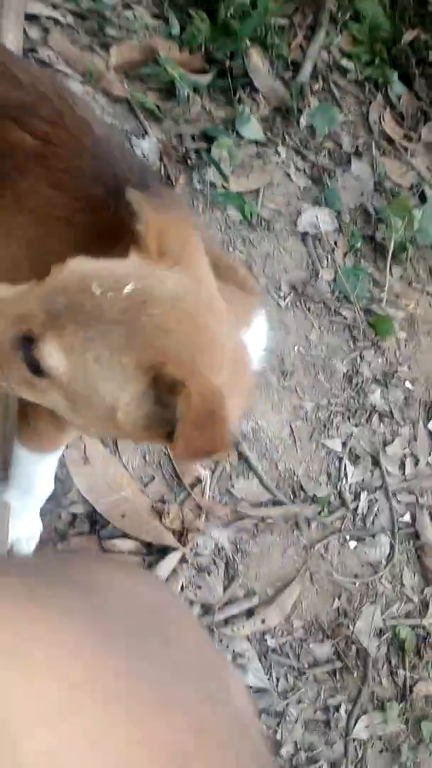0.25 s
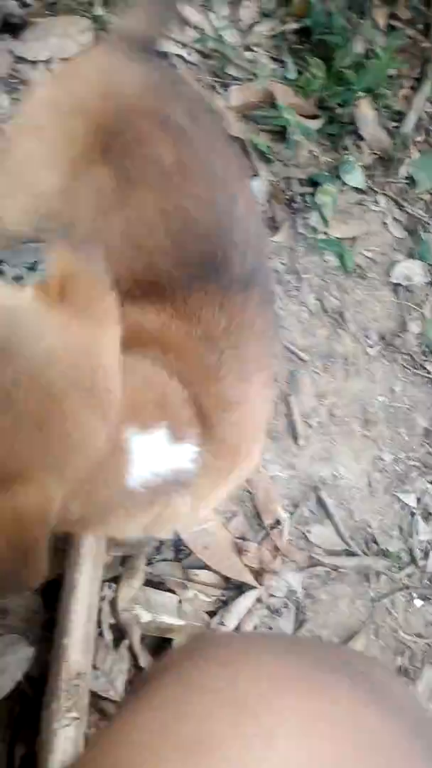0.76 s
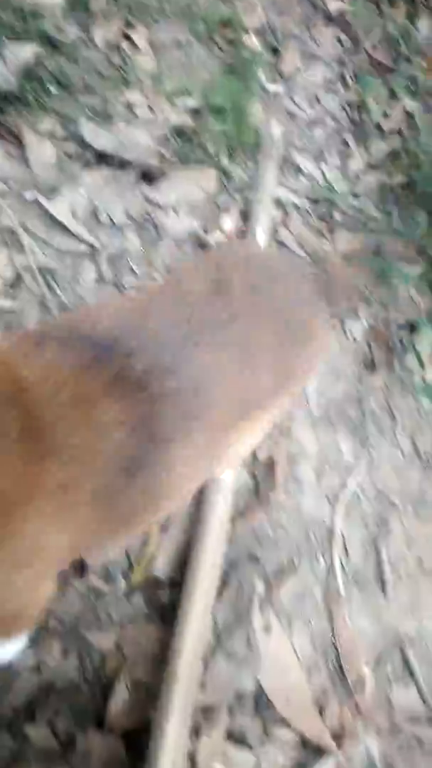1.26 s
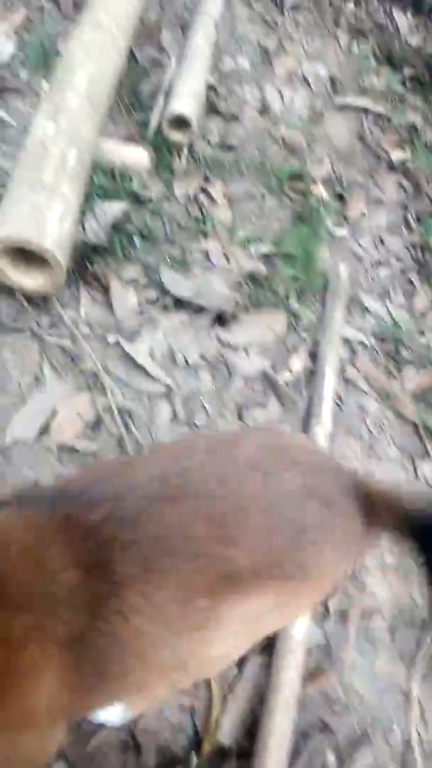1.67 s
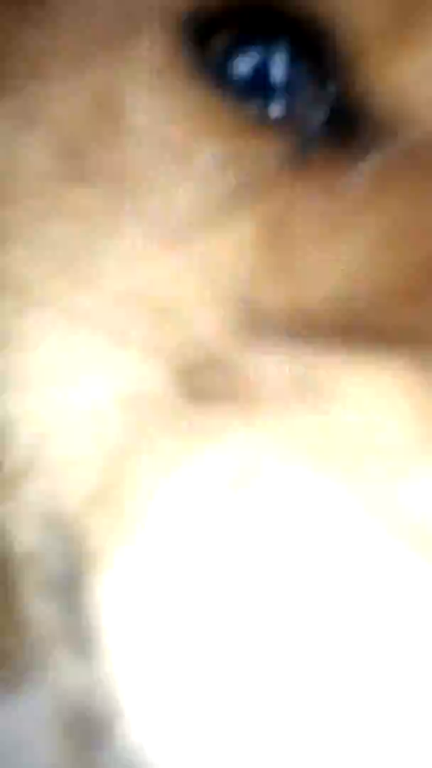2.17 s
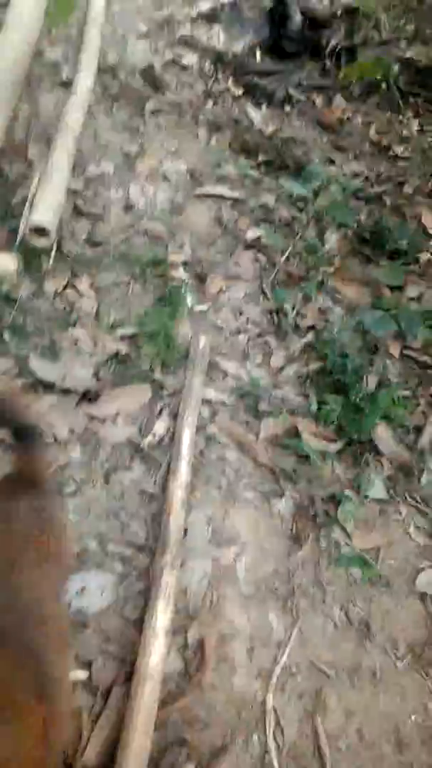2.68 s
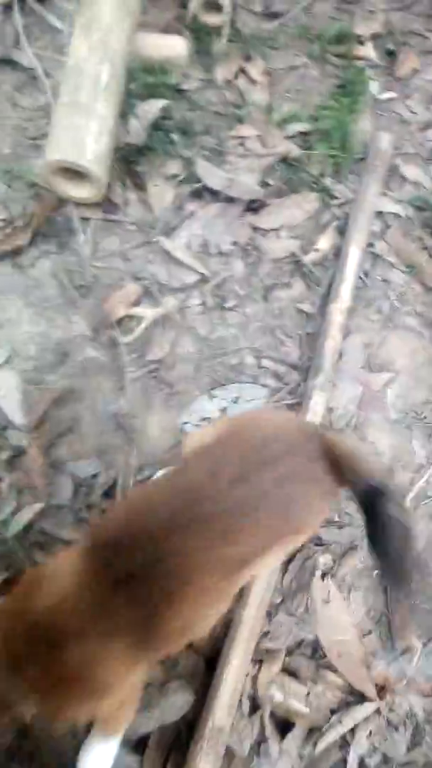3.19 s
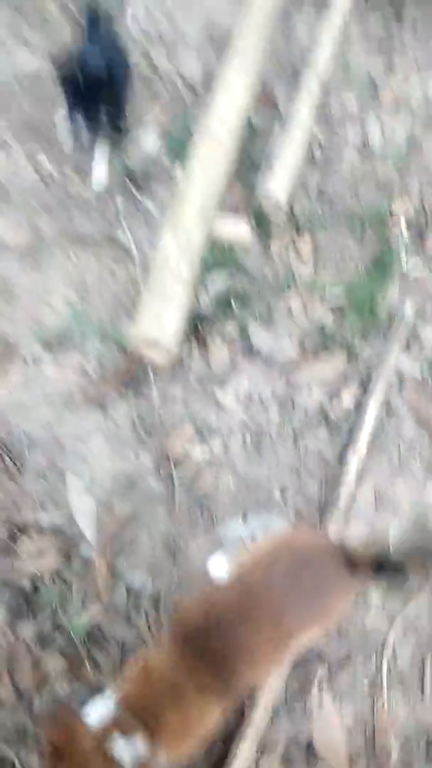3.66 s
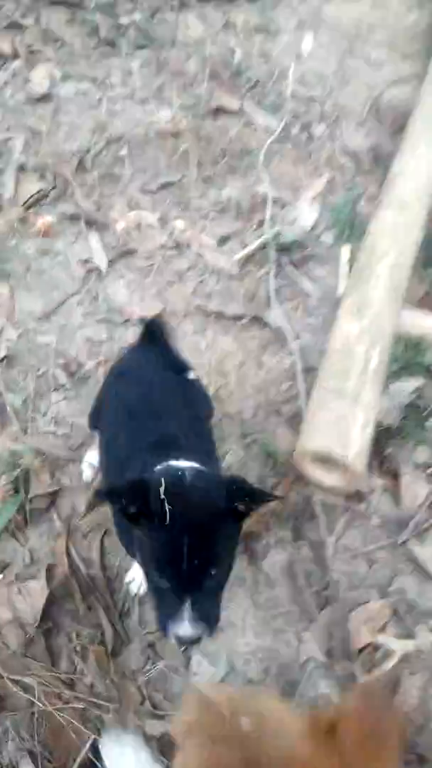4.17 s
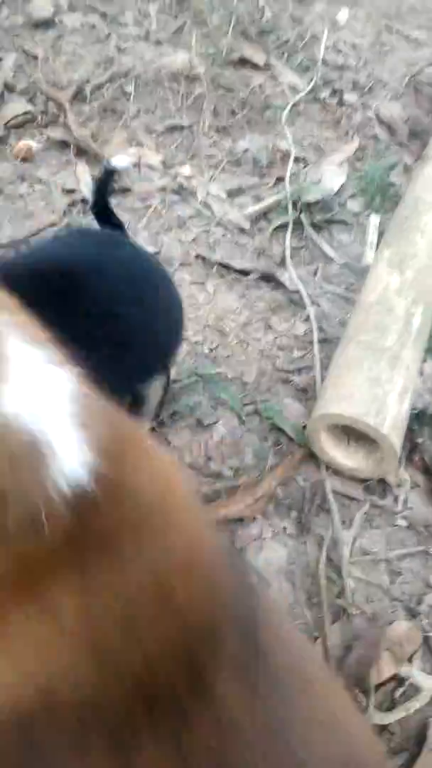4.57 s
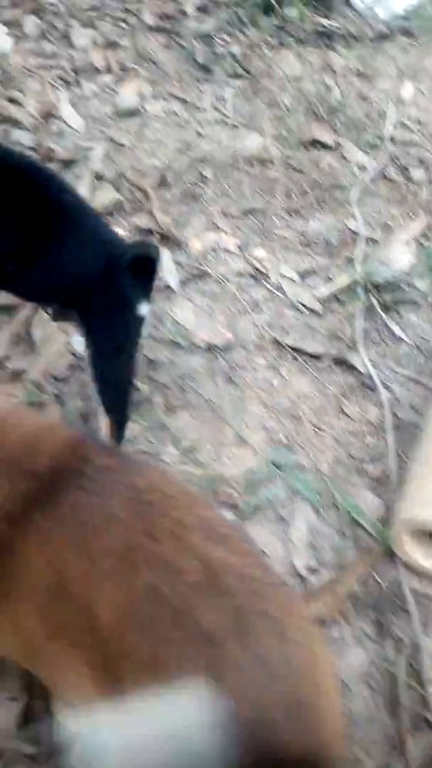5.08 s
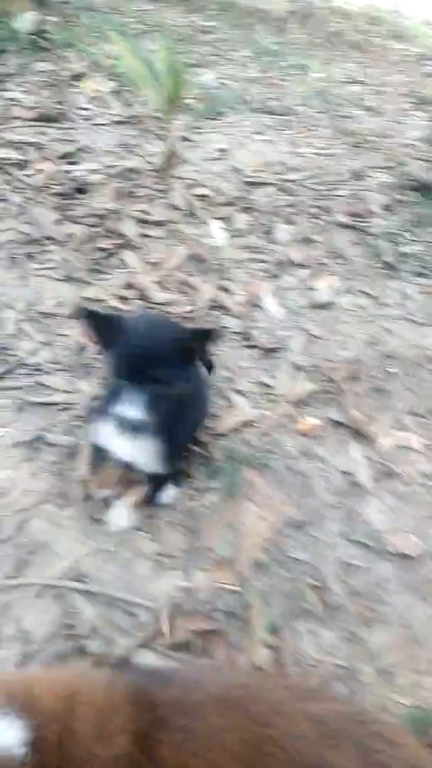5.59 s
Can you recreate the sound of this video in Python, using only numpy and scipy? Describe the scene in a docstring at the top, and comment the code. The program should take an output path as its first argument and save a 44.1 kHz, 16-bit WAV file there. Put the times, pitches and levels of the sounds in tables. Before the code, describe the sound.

Puppies move around a hand-held microphone on a leafy dirt path. At first it is quiet: a croaky grunt, faint hiss, small rustles. Crackling steps build, then a muffled cluster of bumps and scratchy rubbing hits the microphone, with a short snuff. Separate leaf crunches follow, then a rush of bright, brittle trampling with sharp snaps lasts to the end. Dry, close, no echo.

```python
"""A soft creaky grunt over faint hiss is heard first; then puppies trample dry leaves around a hand-held phone.
The leaves are clumps of short wavelets, driven by settling litter, pressing paws and single crunches.
Grunts are pulses ringing throat resonances, snorts are noise through a nasal resonance, rumble is low noise.
A nose shoved against the phone gives low swinging bumps and a rasp over the microphone port, whose cavity
rings near 6.5 kHz. Sharp clicks ring the same port."""
import sys
import numpy as np
from scipy import signal
from scipy.io import wavfile
from scipy.ndimage import uniform_filter1d

SR = 44100
rng = np.random.default_rng(int(sys.argv[2]) if len(sys.argv) > 2 else 0)


def transcribe(u):
    """Save the signal u as a 16-bit wav file named by the first command-line argument.

    u: samples, shape (n,) or (channels, n), limited to [-1, 1]; the rate is SR.
    q: integer samples, one column per channel.
    """
    v = np.clip(np.atleast_2d(u).T, -1, 1)
    q = np.round(v * 32767).astype(np.int16)
    wavfile.write(sys.argv[1], SR, q)


N = 257676
TIME = np.arange(N) / SR  # s
HZ = np.fft.rfftfreq(4096, 1 / SR)  # frequency grid of the colouring filters


def amp(db):
    """Decibel law: 20 dB is a factor of ten in amplitude."""
    return 10 ** (np.asarray(db) / 20)


def evened(x):
    """Normalization by mean power: the result has rms 1."""
    return x / np.sqrt(np.mean(x ** 2) + 1e-20)


def read(points, hz):
    """Interpolation of a spectrum on a logarithmic frequency axis."""
    f, value = np.transpose(points)
    return np.interp(np.log(hz + 1), np.log(f + 1), value)


def add(mix, s, sound):
    """Superposition: the sound adds to the mix from time s, in place."""
    part = mix[round(s * SR):][:len(sound)]
    part += sound[:len(part)]


def drift(n, span):
    """Low-pass random modulation: averaged noise of rms 1 that changes over about span samples."""
    knots = rng.standard_normal(n // 16 + 2)
    smooth = uniform_filter1d(knots, max(round(span / 16), 1))
    return evened(np.repeat(smooth, 16)[:n])


def colour(x, points):
    """Minimum-phase filtering: the Hilbert transform of the log spectrum gives a causal response."""
    log_gain = np.maximum(read(points, HZ), -100) * np.log(10) / 20
    full = np.r_[log_gain, log_gain[-2:0:-1]]
    phase = -signal.hilbert(full).imag
    taps = np.fft.ifft(np.exp(full + 1j * phase)).real[:2048]
    return signal.oaconvolve(x, taps)[:len(x)]


# Spectrum of the far hiss: (f/Hz, level/dB)
AIR_SPECTRUM = [(30, -9.5), (90, -2.5), (230, -1.5), (600, -16.5), (1100, -5), (2600, -27.5), (4500, -12),
                (5300, -3), (6600, -1.5), (7600, -46), (8600, -55), (13400, -40), (14800, -42),
                (15800, -22)]
AIR_DB = -65.5  # rms level


def air_hiss():
    """Stationary broadband noise: white noise shaped by a fixed spectrum."""
    return amp(AIR_DB) * evened(colour(rng.standard_normal(N), AIR_SPECTRUM))


# Hand and ground rumble: (t/s, level/dB, level of the deep part/dB)
RUMBLE_LEVELS = [(0.0, -71, -75), (0.32, -73.5, -77.5), (0.55, -59, -78), (0.748, -68.5, -76),
                 (1.15, -73.5, -75), (1.74, -76, -78), (2.13, -70, -79), (2.3, -51, -47.5),
                 (2.39, -59, -66), (2.52, -49.5, -62), (2.6, -70, -60.5), (2.9, -69.5, -69.5),
                 (3.02, -51, -89), (3.12, -66, -75), (3.4, -74.5, -79), (3.95, -72.5, -72),
                 (4.08, -71, -66), (4.28, -61.5, -74.5), (4.6, -62, -75), (4.88, -63, -67), (5.1, -83, -85),
                 (5.24, -57.5, -75), (5.84, -66, -79)]
# Spectrum of the upper rumble: (f/Hz, level/dB)
RUMBLE_SPECTRUM = [(60, -27.5), (130, -4.5), (215, -2.5), (500, -4), (900, -8.5), (1200, -10), (2000, -65)]
# Spectrum of the deep rumble: (f/Hz, level/dB)
DEEP_SPECTRUM = [(12, -40), (30, -20), (70, -6), (110, -7), (200, -19), (400, -81)]


def rumble():
    """Amplitude-modulated low noise: hand and ground give two spectra that share random lumps."""
    s, *levels_db = np.transpose(RUMBLE_LEVELS)
    lumps = amp(3.4 * drift(N, 900))
    total = np.zeros(N)
    for level_db, spectrum in zip(levels_db, (RUMBLE_SPECTRUM, DEEP_SPECTRUM)):
        noise = colour(rng.standard_normal(N) * lumps, spectrum)
        total += amp(np.interp(TIME, s, level_db)) * evened(noise)
    return total


# Air snorted through a puppy's nose, one list per snort: (t/s, level/dB, centre f/Hz)
SNORT_PATHS = [
    [(0.86, -61, 900.0), (0.96, -55, 840), (0.964, -59.5, 820), (1.112, -67.5, 880), (1.136, -62, 900.0),
     (1.15, -68, 900.0)],
    [(2.43, -61, 1100.0), (2.458, -44, 1000), (2.48, -48, 1020), (2.5, -55, 1100.0)],
]


def snort(rows):
    """Turbulence and resonance: noise passes one broad nasal resonance of moving centre frequency."""
    s, level_db, hz = np.transpose(rows)
    t = np.arange(s[0], s[-1], 1 / SR)
    turn = np.exp(2j * np.pi * np.cumsum(np.interp(t, s, hz)) / SR)
    pole = np.exp(-np.pi * 1200 / SR)  # 1200 Hz wide, used twice
    # shift the centre to zero frequency, low-pass, shift back
    air = rng.standard_normal(len(t)) / turn
    air = signal.lfilter([1], np.convolve([1, -pole], [1, -pole]), air)
    air = (turn * air).real
    return s[0], evened(air) * amp(np.interp(t, s, level_db)) * signal.windows.tukey(len(t), .2)


# Creaky grunts, one list per grunt:
# (t/s, claps per s, nominal clap peak level/dB, mouth opening as level/dB on the upper resonances)
GRUNT_PATHS = [
    [(0, 76, -40, 14), (.035, 58, -38, -3), (.07, 57, -36, 1), (.088, 48, -37, 0), (.108, 39, -53, 4)],
    [(.808, 59, -42, 9), (.838, 56, -39, 3), (.85, 105, -43, 3), (.885, 112, -46, 0)],
]
# Throat resonances, before the mouth opening: (f/Hz, width/Hz, level/dB)
THROAT_RESONANCES = [(766, 185, -0.5), (1640, 480, 8.5), (2470, 150, -9), (3210, 250, -9)]


def grunt(rows):
    """Source and filter: slack vocal folds clap weak and strong in turn; each clap rings the throat."""
    s, rate, peak_db, open_db = np.transpose(rows)
    t = np.arange(s[0], s[-1], 1 / SR)
    count = np.floor(np.cumsum(np.interp(t, s, rate)) / SR)
    clap_db = np.interp(t, s, peak_db) - 2.9 * (count % 2 == 0)  # every second clap is weaker
    clap_db += 2.0 * rng.standard_normal(len(t))
    claps = np.diff(count, prepend=0) * amp(clap_db)
    lift = amp(np.interp(t, s, open_db))
    u = np.arange(600) / SR
    rings = []
    for f, width, db in THROAT_RESONANCES:
        decay = np.exp(-np.pi * width * u)
        onset = np.minimum(u / .0013, 1)
        rings.append(amp(db) * decay * np.sin(2 * np.pi * f * u) * onset)
    first, upper = rings[0], sum(rings[1:])
    claps /= (1 + lift) / 2 * abs(first + upper).max()
    return s[0], np.convolve(claps, first) - np.convolve(claps * lift, upper)


# Shoves on the phone body and paw thuds:
# (t/s, nominal peak level/dB, f/Hz, turns until the envelope is widest)
BUMP_EVENTS = [(1.707, -41.5, 1316, 7.4), (2.12, -38, 114, 1), (2.14, -20.5, 129, 0.45),
               (2.142, -32.5, 288, 1), (2.154, -39, 100, 0.42), (2.171, -34, 104, 0.48),
               (2.183, -29, 104, 0.39), (2.212, -41, 110, 0.77), (2.254, -32.5, 400, 0.32),
               (2.356, -29.5, 258, 0.28), (2.367, -22.5, 285, 0.35), (2.38, -22.5, 240, 0.32),
               (2.472, -42, 171, 0.82), (2.485, -33, 202, 0.73), (2.492, -28.5, 150, 0.42),
               (2.498, -30, 724, 1.1), (2.513, -32, 212, 0.54), (2.523, -31, 96.5, 0.51),
               (2.5337, -34.5, 91, 0.51), (2.781, -42, 576, 1.4), (3.886, -44.5, 73, 0.87),
               (3.911, -35, 92, 0.74)]


def bump(peak_db, hz, turns):
    """Damped oscillation: a push in and a rebound that swells and dies away."""
    u = np.arange(0, 6 * turns, hz / SR) / turns  # 1 at the widest swing
    swell = (u * np.exp(1 - u)) ** 2.03
    return -amp(peak_db) * np.sin(2 * np.pi * turns * u) * swell


# Spectrum of crackle through the port, with the cavity's peak: (f/Hz, level/dB)
PORT_SPECTRUM = [(180, -43.5), (300, -24), (700, -21), (1300, -15.5), (2600, -6), (3500, -1.5), (4700, -2),
                 (5700, 3.5), (6550, 7), (7200, 3), (8200, -9.5), (13500, -31), (14700, -21.5),
                 (15800, -18)]
# Single sharp clicks, a twig breaking or skin slipping on the case: (t/s, peak level/dB, f/Hz)
SNAP_EVENTS = [(0.597, -36, 5400), (0.689, -33, 4300), (0.751, -37.5, 3130), (0.888, -33, 5550),
               (1.136, -40, 5600), (1.349, -32, 4940), (1.374, -38, 4500), (1.39, -34, 5300),
               (1.417, -23, 5800), (1.456, -24, 5860), (1.537, -25, 2760), (1.641, -39, 5970),
               (1.664, -42, 5470), (1.7108, -11.5, 5680), (1.845, -40, 5540), (2.004, -32, 2700),
               (2.023, -37, 6170), (2.042, -28, 6000), (2.134, -32, 930), (2.202, -15.5, 5630),
               (2.205, -18, 5560), (2.21, -14, 3600), (2.32, -27, 5560), (2.329, -17, 5700),
               (2.781, -25, 5990), (3.251, -28, 6600), (3.401, -21, 5800), (3.44, -39, 5000),
               (3.629, -36, 5100), (3.703, -39, 5160), (3.748, -38.5, 4770), (4.06, -32, 3840),
               (4.133, -29.5, 5500), (4.254, -13, 5560), (4.714, -37, 1500), (4.748, -22, 1450),
               (4.84, -32, 5500), (4.883, -31, 1290), (4.565, -20.5, 5000), (4.864, -22.5, 5400),
               (5.219, -24, 5830), (5.322, -22, 4350), (5.51, -24.5, 6600), (5.473, -24, 2940),
               (5.697, -19, 6100), (5.793, -21, 4050), (5.609, -24, 5860), (5.621, -29, 6000),
               (5.694, -32, 5460)]
SNAP_TURNS = 2.3  # turns until the envelope is widest


def snap(peak_db, hz):
    """Impulse excitation of a resonator: a few quick, ragged swings ring the port."""
    u = np.arange(500) / SR * hz / SNAP_TURNS
    ragged = np.sin(2 * np.pi * SNAP_TURNS * u) + 1.06 * rng.standard_normal(len(u))
    click = colour(ragged * u * np.exp(-u), PORT_SPECTRUM)
    return amp(peak_db) * click / abs(click).max()


def leaf_band(lo, hi):
    """Band power summation: level of white noise of rms 1 between lo and hi Hz after the port."""
    inside = HZ[(HZ > lo) & (HZ < hi)]
    return np.sqrt(np.sum(amp(read(PORT_SPECTRUM, inside)) ** 2) / len(HZ))


def crackle(levels, per_s, spread_db, turns, clump_db, patch_db, ticks_per_s, tick_db):
    """Random impulse process: leaf cells snap in clumps, small pieces high and often, large ones low."""
    n = levels.shape[1]
    pitches = np.geomspace(300, 15000, num=28)  # Hz
    step = np.log(pitches[1] / pitches[0])
    bands = [(4500, 9000), (2500, 4500), (700, 2500)]  # Hz: main, middle, low
    logs = [np.log(level / leaf_band(*band) + 1e-9) for level, band in zip(levels, bands)]
    clumps_db = clump_db * drift(n, 80)
    out = np.zeros(n)
    for hz in pitches:
        luck = rng.random(n) / (per_s * (hz / 3000) ** .6 / SR)  # under 1 where a snap falls
        size_db = spread_db * np.minimum(-np.log(luck + 1e-12), 4)
        # each size comes and goes in patches of its own
        snaps = (luck < 1) * amp(size_db + clumps_db + patch_db * drift(n, 600))
        t = np.arange(int(turns * SR / hz) + 2) / SR
        wave = np.sin(2 * np.pi * hz * t) * np.sin(np.pi * t / t[-1]) ** 2
        wave = wave / np.linalg.norm(wave)
        # blend the levels of the two nearest bands
        place = np.interp(np.log(hz), np.log([1600, 3300, 5500]), [2, 1, 0])
        level = np.exp(sum(max(1 - abs(place - k), 0) * log for k, log in enumerate(logs)))
        share = np.sqrt(2 * hz * step / SR)  # this pitch's share of a white spectrum
        out += signal.oaconvolve(evened(snaps) * level, wave)[:n] * share
    # stems break with a tick of all pitches at once
    luck = rng.random(n) / (ticks_per_s / SR)
    ticks = (luck < 1) * amp(spread_db * np.minimum(-np.log(luck + 1e-12), 3))
    tick_level = np.exp((logs[0] + logs[1]) / 2)
    out += amp(tick_db) * evened(uniform_filter1d(ticks, size=4)) * tick_level
    return colour(out, PORT_SPECTRUM)


# Nose and whiskers dragged over the port, lists joined into one drag:
# (t/s, level/dB, middle part relative level/dB, low part relative level/dB)
SCRATCH_PATHS = [
    [(2.192, -27, -1.6, 2.5), (2.198, -31, -0.22, 1), (2.21, -30, 1.6, 1), (2.216, -39, 2, -2)],
    [(2.217, -37, -3, 3), (2.243, -40, 2.5, 1.5), (2.281, -23.5, -14, -10.5), (2.331, -27, -14, -6),
     (2.342, -40.5, 9, 9)],
]


def scratch():
    """Stick-slip friction: wet skin on the case gives a dense rasp that stops at once."""
    s, level_db, middle_db, low_db = np.vstack(SCRATCH_PATHS).T
    t = np.arange(s[0], s[-1], 1 / SR)
    levels = np.array([amp(np.interp(t, s, level_db + db)) for db in (0, middle_db, low_db)])
    levels *= signal.windows.tukey(len(t), .02)
    return s[0], crackle(levels, per_s=1200, spread_db=3.5, turns=5.9, clump_db=3.0, patch_db=3.5,
                         ticks_per_s=470, tick_db=-11.0)


# Litter settling between treads:
# (t/s, crackle level/dB, middle crunch relative level/dB, low crunch relative level/dB)
SETTLING = [(0.0, -72, -5, 13.5), (0.29, -71, -12, -7), (0.62, -66.5, 2, 7.5), (0.8, -66.5, -9, -4),
            (1.0, -67.5, 4, -20), (1.28, -79, 0, -7), (1.32, -49, -5, -19), (1.65, -55, -8.5, -14),
            (2.1, -56.5, -5, -9), (2.44, -62.5, 1.5, -12), (2.62, -70, 3, -1), (2.95, -62.5, 0.5, -9),
            (3.25, -49.5, -12, -6), (3.47, -75, -6.5, -6), (3.58, -72, -8, -11), (3.85, -59.5, -5, -11.5),
            (4.05, -50.5, -8, -8.5), (4.3, -45, -8, -9.5), (4.9, -50, -22, -15), (5.15, -49, -9, -2.5),
            (5.35, -43, -7, -14), (5.84, -44.5, -21, 1)]
# Paws pressing into the litter: (t/s of full weight, level/dB, middle crunch relative level/dB,
# low crunch relative level/dB, swell by TREAD_DB t/s, fade by TREAD_DB t/s)
TREAD_EVENTS = [(0.361, -47.5, -4, -2, 0.049, 0.12), (0.53, -51, -10, -5, 0.027, 0.15),
                (0.69, -57.5, -4, 0, 0.036, 0.14), (0.892, -50, -1.5, -10, 0.041, 0.085),
                (1.1, -49, -15, -21, 0.11, 0.056), (1.305, -48.5, -3, -26, 0.016, 0.19),
                (1.365, -53.5, -16, -16, 0.063, 0.018), (1.455, -40, -3.5, -16, 0.13, 0.043),
                (1.555, -44.5, 0, -5, 0.057, .025), (1.71, -38, -8.5, -12.5, 0.024, 0.078),
                (1.9, -43, -2.5, -18, 0.056, 0.1), (2.04, -47.5, -2, -8.5, 0.082, 0.074),
                (2.15, -53, -12, -0.5, 0.1, 0.056), (2.4, -47.5, -13, -7.5, .15, 0.05),
                (2.5, -38, -9, -19, 0.063, 0.021), (2.594, -48, -14, -33, 0.16, 0.011),
                (2.66, -40.5, -34, -36, .03, 0.072), (2.749, -40.5, -10, -6, 0.023, 0.2),
                (3.03, -40.5, -7.5, -3.5, 0.067, 0.11), (3.16, -60, -17, -8, 0.059, .12),
                (3.26, -41, -10.5, -17, 0.098, 0.11), (3.349, -41.5, -7.5, -7, 0.12, .2),
                (3.42, -35, -7, -8.5, 0.11, 0.016), (3.65, -55.5, -7.5, -16, 0.055, 0.3),
                (4.0, -47, -7, -15, 0.1, 0.06), (4.249, -23.5, -12.5, -12.5, 0.016, 0.039),
                (4.436, -26.5, -6, -19, 0.015, 0.064), (4.54, -41.5, -10, -6.5, 0.054, 0.14),
                (4.6, -26.5, -4.5, -11, 0.015, 0.041), (4.64, -43, -3, -1.5, 0.048, 0.17),
                (4.769, -31.5, -8, -15, 0.067, 0.053), (4.798, -35.5, -6.5, -8, 0.11, 0.23),
                (5.046, -31, -1.5, -11, 0.027, 0.053), (5.21, -34.5, -7, -12, 0.019, 0.12),
                (5.47, -38.5, -11, -12, 0.25, 0.078), (5.61, -31.5, -10, -27, 0.055, .015),
                (5.7, -32, -9, -24, 0.071, 0.2), (5.755, -33, -8.5, -12.5, 0.07, 0.22)]
TREAD_DB = 20
# Paws breaking leaves: (t/s, nominal peak level/dB, middle crunch relative level/dB,
# low crunch relative level/dB, t/s until 60 dB down)
CRUNCH_EVENTS = [(0.525, -28.5, -5.5, -15.5, 0.046), (0.686, -44, 12.5, -24, 0.016),
                 (0.884, -32.5, 5, -24, 0.037), (0.916, -34.5, -15, -18, 0.051),
                 (1.077, -32.5, -32, -31, 0.058), (1.1017, -44.5, 7.5, -18, 0.1),
                 (1.3016, -36, -7, -17, .069), (1.341, -30, -2, -19, .036), (1.4137, -28.5, -5, -13, 0.1),
                 (1.438, -32, 3.5, -12, 0.048), (1.537, -35.5, 10, -18, 0.045),
                 (1.7073, -20.5, 7, -22, 0.022), (1.882, -32, -3, -13, 0.057), (2.0218, -46, -15, -3, .045),
                 (2.131, -31.5, -21, 12.5, 0.02), (2.4905, -28, -18, -16, 0.035),
                 (2.4967, -28.5, -6, -2, 0.026), (2.52, -30, -9.5, -18, 0.027),
                 (2.742, -24.5, -11, -33, 0.053), (2.7766, -21, -14, -7.5, 0.032),
                 (2.975, -33.5, -9, -20, 0.14), (3.031, -29, -4.5, -23, 0.081),
                 (3.1356, -32, -20, -7, 0.07), (3.151, -29.5, -4, -10.5, 0.078),
                 (3.392, -23.5, -14, -8, 0.066), (3.5, -37, -9, -36, 0.052), (3.8168, -32, -6, -24, .056),
                 (3.971, -24, -14.5, -18, 0.066), (4.2443, -26, -19, -25, 0.041),
                 (4.3126, -27.5, -11, -15, 0.055), (4.3655, -34, -20, -28, 0.056),
                 (4.4218, -13, -13, -37, 0.037), (4.437, -10.5, -21, -30, 0.022),
                 (4.4647, -17, -22, -20, 0.048), (4.5407, -26, -3, -10, .051),
                 (4.5943, -10.5, -7.5, -25, 0.039), (4.6285, -20, -15, -14, 0.04),
                 (4.6506, -29, -7, -26, .045), (4.663, -22, -11, -27, 0.019), (4.75, -20, -15, -30, .036),
                 (4.796, -21, 1, -6, 0.018), (4.862, -26.5, -22, -19, .057), (4.975, -28, -12, -30, 0.039),
                 (5.027, -21.5, -13, -22, 0.027), (5.1218, -35.5, -17, -27, 0.096),
                 (5.2024, -26, -1, -26, .045), (5.2106, -16, -7.5, -16, 0.039),
                 (5.32, -25.5, -12, -34, 0.053), (5.362, -22.5, -11.5, -19, 0.06),
                 (5.3923, -21, -10.5, -9.5, 0.038), (5.43, -29, -18, -17, 0.037),
                 (5.454, -28, 1, -23, 0.029), (5.4665, -27.5, 0.5, 1.5, 0.031),
                 (5.575, -23.5, -5.5, -18, 0.096), (5.6826, -17.5, -24, -6, 0.029),
                 (5.689, -19.5, -5, -26, 0.03)]
CRUNCH_RISE_S = 0.0043


def leaves():
    """Addition of incoherent powers: settling, treads and crunches together drive one bed of leaves."""
    s, level_db, middle_db, low_db = np.transpose(SETTLING)
    power = np.array([amp(np.interp(TIME, s, level_db + db)) ** 2 for db in (0, middle_db, low_db)])
    for s, level_db, middle_db, low_db, swell, fade in TREAD_EVENTS:
        away = np.maximum((s - TIME) / max(swell, .005), (TIME - s) / max(fade, .005))
        relative_db = np.array([[0], [middle_db], [low_db]])
        power += amp(level_db - TREAD_DB * away + relative_db) ** 2
    t = np.arange(SR // 4) / SR
    for s, peak_db, middle_db, low_db, t60 in CRUNCH_EVENTS:
        fade_db = 60 * (t / max(t60, .005)) ** 2  # the leaves give way for a while, then lie flat
        rise = np.minimum(t / CRUNCH_RISE_S, 1)
        burst = amp(peak_db - fade_db) * rise / 3  # rms: swings reach about thrice this
        for band, db in zip(power, (0, middle_db, low_db)):
            add(band, s, (burst * amp(db)) ** 2)
    return crackle(np.sqrt(power), per_s=1200, spread_db=1.5, turns=7.73, clump_db=2.0, patch_db=3.5,
                   ticks_per_s=120, tick_db=-8.5)


def scene():
    """Linear superposition of the continuous beds and the timed events."""
    mix = leaves() + rumble() + air_hiss()
    add(mix, *scratch())
    for s, *click in SNAP_EVENTS:
        add(mix, s, snap(*click))
    for s, *blow in BUMP_EVENTS:
        add(mix, s, bump(*blow))
    for rows in GRUNT_PATHS:
        add(mix, *grunt(rows))
    for rows in SNORT_PATHS:
        add(mix, *snort(rows))
    return mix[None]


CEILING_DB, EDGE_HZ = -11, 15650  # saturation level, upper band edge


def record(dry):
    """Saturation and band limiting: the input stage rounds off the loudest cracks, then a low-pass."""
    soft = amp(CEILING_DB) * np.tanh(dry / amp(CEILING_DB))
    low_pass = signal.firwin(511, EDGE_HZ, window=("kaiser", 9), fs=SR)
    return signal.oaconvolve(soft, low_pass[None], "same")


dry = scene()
out = record(dry)
transcribe(out)
```